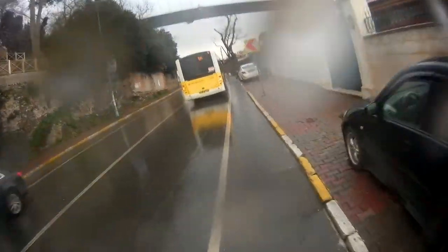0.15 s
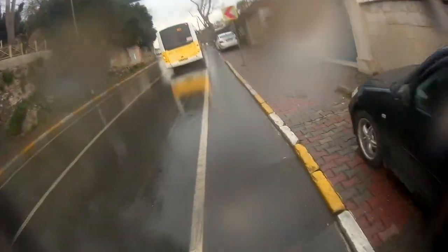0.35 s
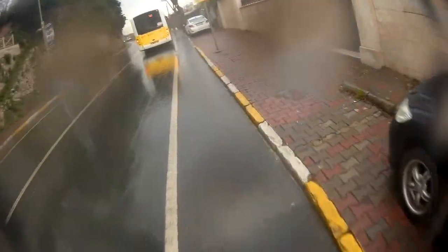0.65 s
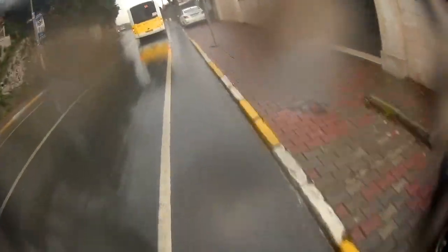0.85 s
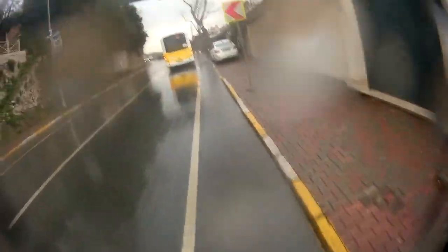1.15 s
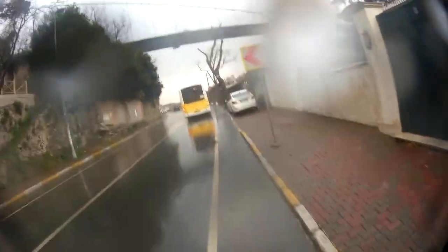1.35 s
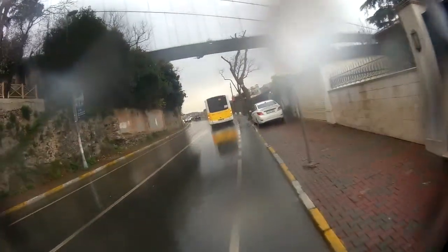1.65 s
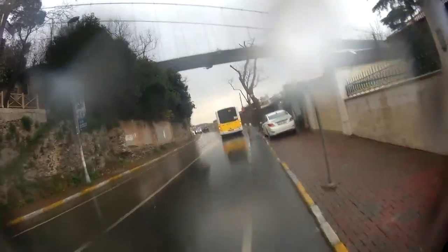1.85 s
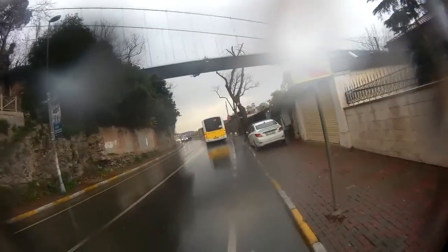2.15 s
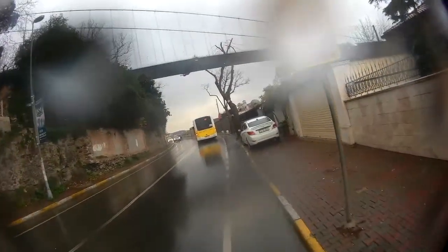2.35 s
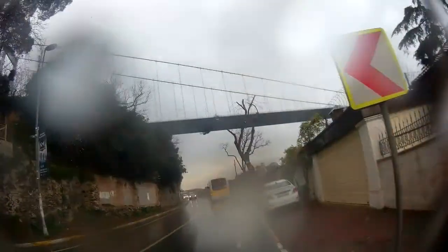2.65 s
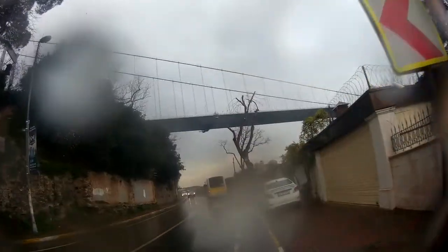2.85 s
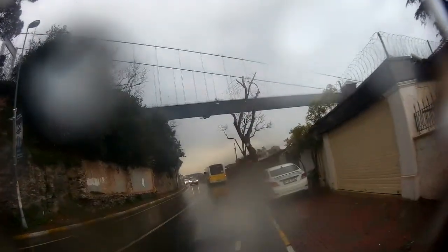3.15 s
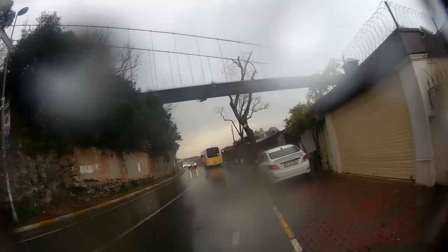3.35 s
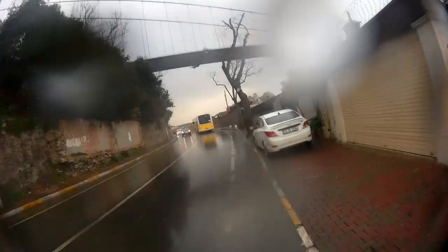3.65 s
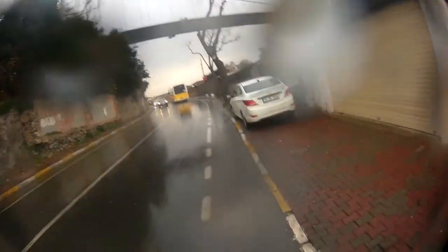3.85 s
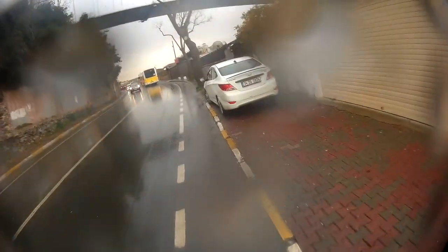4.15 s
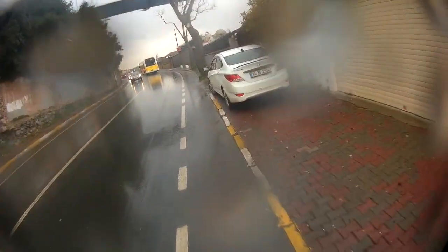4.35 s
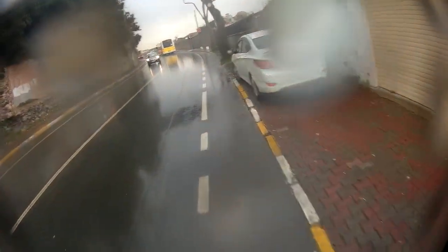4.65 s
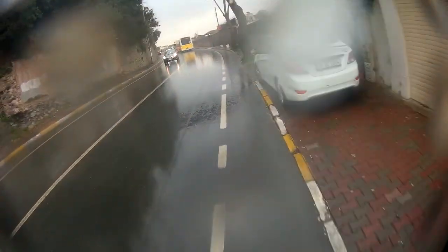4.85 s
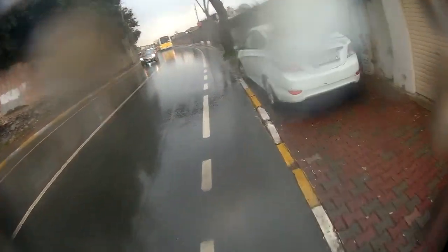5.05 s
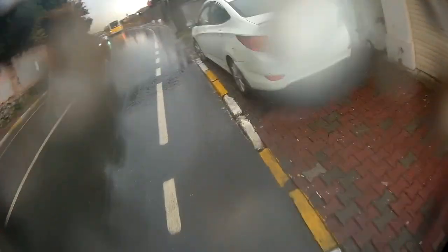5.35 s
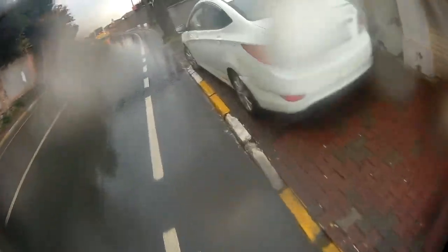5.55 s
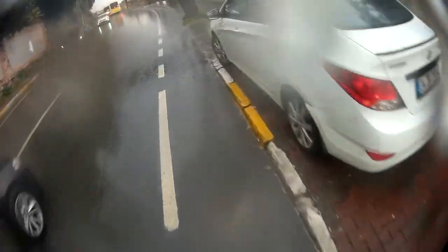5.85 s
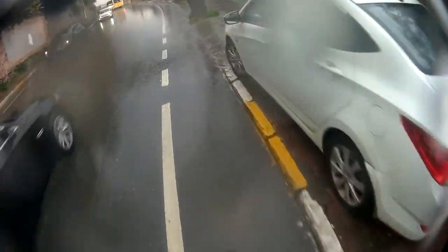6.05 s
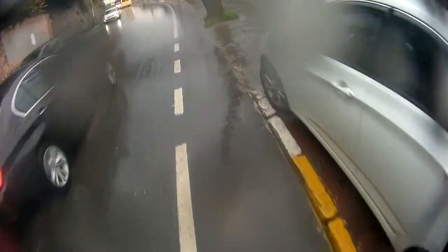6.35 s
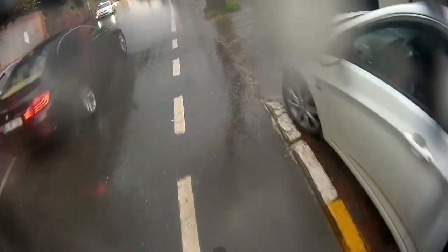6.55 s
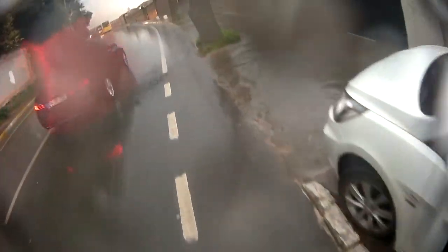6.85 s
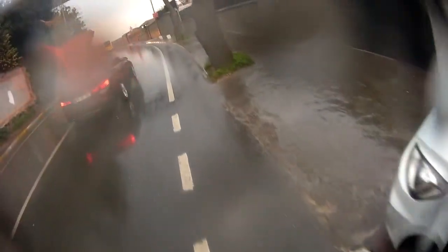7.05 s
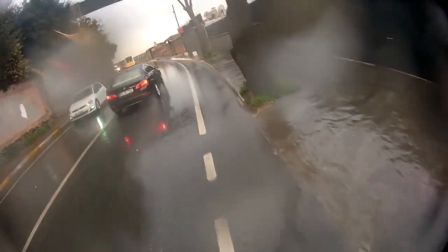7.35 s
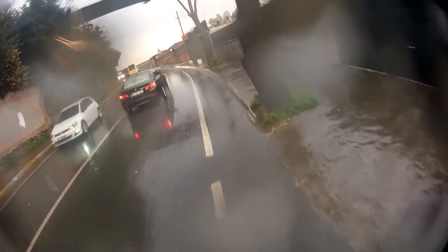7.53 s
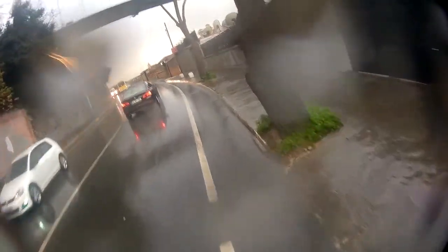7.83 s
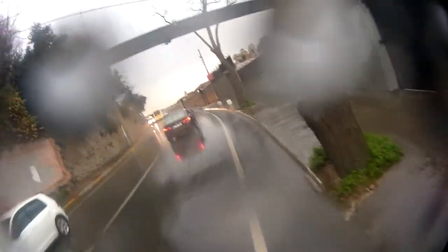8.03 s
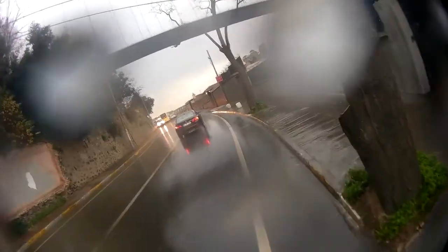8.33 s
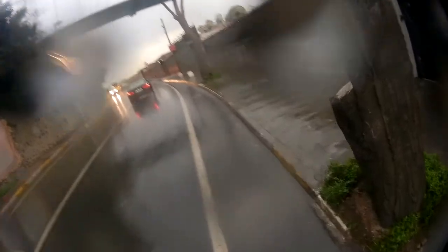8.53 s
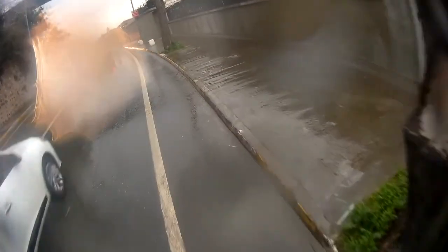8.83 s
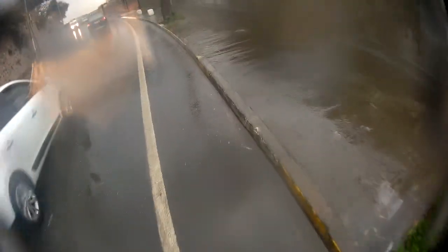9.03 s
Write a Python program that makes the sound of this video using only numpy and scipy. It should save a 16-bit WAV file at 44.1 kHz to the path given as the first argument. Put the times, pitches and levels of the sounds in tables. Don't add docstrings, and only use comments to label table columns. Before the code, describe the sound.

A muffled, boxy wash of wet tyre spray dips softly, then surges with passing cars, puddle splashes and crisp droplets hitting the camera case.

```python
import sys
import numpy as np
from scipy import signal
from scipy.fft import rfft, irfft, next_fast_len
from scipy.io import wavfile
from scipy.ndimage import uniform_filter1d

SR = 44100
rng = np.random.default_rng(int(sys.argv[2]) if len(sys.argv) > 2 else 0)


def wav_record(signal):
    frames = np.transpose(np.atleast_2d(signal))
    bounded = np.clip(frames, -1, 1)
    quanta = np.round(bounded * 32767).astype(np.int16)
    wavfile.write(sys.argv[1], SR, quanta)


def attenuation_scalar(level_db):
    decades = np.asarray(level_db, float) / 20
    return 10 ** decades


N = 405279
SIZE = next_fast_len(N)
HZ = np.arange(SIZE // 2 + 1) * SR / SIZE

# time_s, loudness_db, mist_over_splash_db
TRAFFIC = [(0.0,-40.5,5), (0.33,-41.5,2), (1.0,-43,2.2), (1.77,-46,2.5), (2.39,-48,0.6), (3.18,-52,0),
           (4.16,-51,-3), (4.24,-47.5,-2), (5.23,-42,1.4), (5.71,-36,3.5), (6.3,-35.5,0.1),
           (6.51,-37.5,-0.5), (7.41,-37,-2), (7.62,-38,-1.5), (8.45,-38.5,-1), (8.52,-37.5,0.2),
           (9.05,-38,-1), (9.19,-39,2)]
# time_s, water_film_db, asphalt_coarseness_db
ROAD = [(0.0, -2.3, 1), (0.69, 2.19, 0.2), (1.45, -0.66, 0.5), (2.28, 0.2, -1.5), (2.61, -0.5, -1),
        (3.08, -2.11, -2), (3.82, -0.7, -0.5), (4.0, 3.5, -1), (5.15, 2.4, -1.5), (5.59, 0, -4.5),
        (6.35, -1.6, 0), (6.99, -1.5, 0.2), (7.08, -2.5, -2.27), (7.91, 0, -1.8), (8.14, -2.1, -1.5),
        (9.19, -0.02, 1.1)]
# centre_s, swell_db, length_s
SHEETS = [(.62, 0.8, .1), (.97, 0.5, .12), (1.4, 0, .15), (2.2, .6, .1), (2.417, 1.4, .24),
          (2.86, 1.7, 0.26), (3.5, 0, 0.27), (3.72, 1, .1), (4.5, 1, .2), (5.45, 0.8, .06),
          (5.702, 2, 0.12), (6.118, 3, 0.34), (6.45, .8, .06), (6.68, 1.6, 0.31), (7.125, 2.5, .08),
          (7.28, -0.2, .1), (7.443, 1.5, .1), (7.93, 0.5, 0.27), (8.08, 1.3, .08), (8.3, .8, .1),
          (8.562, 1.7, 0.11), (8.68, 1, .1), (8.85, 1.2, .24)]
LAYER_DB = [
    -60.5,
    -63,
    -59,
    -50,
    -47,
    -47,
]
LAYER_RESPONSE = [
    (.59, -.48, .43, 0.4, -.15),
    (.68, -.34, -0.16, .94, .47),
    (.76, -.56, 0.99, -0.14, 1.1),
    (1.01, -0.39, -.6, -.24, 0.15),
    (.99, .13, 0.42, 0.37, .79),
    (1.06, 1, -0.17, -.1, 1.8),
]
REFERENCE_DB = -42
# frequency_hz, gain_db
WALL = [(500, -14), (900, -16), (1300, -26), (2300, -50), (2600, -26.5), (3700, -15), (6300, -13),
        (10500, -10), (14300, 3), (15700, -7.5)]
# centre_hz, width_hz, gain_db
CASE_RESONANCES = [(1090, 38, -6.5), (1447, 75, -8.5), (1535, 128, -7), (1887, 137, -9.5),
                   (2987, 370, -11.5), (4905, 764, 1), (7740, 1300, -9), (14000, 1700, -20)]
# centre_hz, width_hz, depth (0-1), start_s, end_s
NOTCHES = [(2580, 100, .25, -1, 3.8), (2580, 100, .75, 3.8, 10), (3300, 190, .8, 1.2, 1.8),
           (3250, 220, .85, 1.8, 2.42), (3270, 150, .45, 3.2, 5.9), (3350, 300, .4, 7.1, 7.9),
           (6400, 900, .42, -1, 10), (6400, 700, .2, 1.1, 1.6), (2400, 300, .2, -1, 4)]
NOTCH_FLICKER, NOTCH_FLICKERS_PER_S = .25, 10
# start_s, peak_db, centre_hz
DROPS = [(0.9084, -33, 11900), (0.931, -28, 11400), (1.355, -29, 11000), (1.3794, -33, 12600),
         (1.4341, -32, 12900), (3.5628, -39.5, 6000), (6.9845, -22, 14500), (6.9844, -33, 7500),
         (7.091, -20.5, 13700), (7.0908, -26, 8800), (7.265, -26, 12000)]
DROP_WIDTH_HZ, DROP_T60_S = 8900, 0.0049
# start_s, peak_db, centre_hz, width_hz, t60_s
SPATTER = [
    (7.094, -31.5, 11000, 8000, 0.08),
]
# start_s, peak_db, centre_hz
TICKS = [(0.6074, -39.5, 3100), (0.7022, -28, 3150), (0.9853, -38, 3200), (0.9847, -39, 4100),
         (1.1318, -43, 3250)]
TICK_WIDTH_HZ, TICK_T60_S = 1400, 0.0028
# start_s, peak_db, centre_hz
KNOCKS = [(0.608, -46, 860), (0.6085, -48, 1550), (0.734, -52, 186), (0.751, -57, 250), (0.976, -54, 310),
          (1.034, -53, 186), (1.037, -51, 298), (1.199, -57, 150)]
KNOCK_WIDTH_HZ, KNOCK_T60_S = 420, .016
# start_s, peak_db, sway_hz
BUMPS = [(.70, -54, 11.), (.795, -51, 11.6), (.883, -50, 9.6), (1.01, -48, 14.5), (1.15, -56, 13),
         (1.215, -51, 15)]
SWAY_T60_S, SWAY_OVERTONE = 0.57, 0.26
# frequency_hz, gain_db
HISS = [(15, -1.5), (40, -1.5), (120, -1.5), (300, -1), (700, -3.5), (1200, -7.5), (2300, -21), (5000, -20),
        (15000, -22)]
HISS_DB = -59.5
BAND_EDGES = [0, 40, 48, 56, 64, 72, 80, 88, 96, 108, 120, 132, 144, 160, 176, 196, 216, 240, 264, 292] + list(range(320, 737, 32))
# frequency_hz, step_db
STEP = [(500, -12), (1500, -5), (2200, 0), (2700, 3), (3300, 3), (4500, -1), (6300, 2), (9000, -1),
        (15000, -1)]
# frequency_hz, level_db
THRESHOLD = [(14300, -80), (15200, -60), (15700, -47)]
TOP_LINE = 730
# start_s, length_s, edge_hz
TREBLE_GAPS = [
    (3.553, 0.031, 8600),
    (6.306, 0.033, 8840),
]
# centre_s, bands_widened
WIDENINGS = [(.081, 1), (.258, 2), (1.528, 2), (2.222, 2), (2.287, 1), (2.986, 3), (3.235, 2), (4.634, 2),
             (4.682, 1), (5.006, 2), (5.144, 1), (6.097, 2), (7.235, 1), (8.417, 3), (8.558, 1), (8.652, 2),
             (8.884, 1), (8.928, 2), (9.047, 1)]
WIDEN_FROM_HZ, WIDEN_TO_HZ, WIDEN_WIDTH_HZ = 4200, 13200, 1500


def tyres():
    droplets = rng.standard_normal(N) * attenuation_scalar(.6 * rng.exponential(size=N) + .5 * walk(300))
    rings = sum(attenuation_scalar(2 * db) / (1 + (2 * (HZ - f) / w) ** 2) ** 1.38 for f, w, db in CASE_RESONANCES)
    case_gain = np.sqrt(slope(HZ, WALL) ** 2 + rings)
    heard = cancel(rfft(droplets, SIZE) * case_gain)
    edges = [1] + [above(HZ, edge, 24) for edge in (1700, 2500, 3600, 6400, 11000)] + [0]
    layers = np.c_[LAYER_DB] + np.array(LAYER_RESPONSE) @ road_state()
    roar_db, whine_db, sizzle_db, splash_db, spray_db, mist_db = layers
    gust = 0.19 * walk(14)
    levels = [roar_db + 0.34 * walk(10) + 0.5,
              whine_db + 0.66 * walk(10) + 0.36,
              sizzle_db + 0.48 * walk(13) + 0.21,
              splash_db + 0.43 * gust + 0.32 * walk(18),
              spray_db + gust + 0.6 * walk(20),
              mist_db + gust + 0.44 * walk(25)]
    out = np.zeros(N)
    for low, high, level in zip(edges, edges[1:], levels):
        share = np.sqrt(np.clip(low - high, 0, 1))
        part = irfft(heard * share, SIZE)[:N]
        out += unit(part) * attenuation_scalar(level)
    return out


def road_state():
    t = np.arange(N) / SR
    loud_db, mist_db = spread(TRAFFIC)
    sheets_db = sum(db * np.exp(-(2 * (t - s) / length) ** 2) for s, db, length in SHEETS)
    return np.array([loud_db - REFERENCE_DB, mist_db, *spread(ROAD), sheets_db])


def cancel(heard):
    out, t = irfft(heard, SIZE), np.arange(SIZE) / SR
    for f, width, depth, start, end in NOTCHES:
        narrow = irfft(heard / (1 + (2 * (HZ - f) / width) ** 2), SIZE)
        restless = 1 + NOTCH_FLICKER * np.resize(walk(NOTCH_FLICKERS_PER_S), SIZE)
        is_open = np.clip(np.minimum(t - start, end - t) / 0.055 + .5, 0, 1)
        out -= np.clip(depth * restless, 0, 1) * is_open * narrow
    return rfft(out)


def drops():
    bursts = [(*row, DROP_WIDTH_HZ, DROP_T60_S) for row in DROPS]
    return hits([*bursts, *SPATTER], grit=1)


def mount_knocks():
    ticks = [(*row, TICK_WIDTH_HZ, TICK_T60_S) for row in TICKS]
    knocks = [(*row, KNOCK_WIDTH_HZ, KNOCK_T60_S) for row in KNOCKS]
    return hits(ticks + knocks, grit=.2)


def hits(table, grit):
    lead = 512
    out, t = np.zeros(N), np.clip(np.arange(-lead, 4096) / SR, 0, None)
    freqs = np.arange(len(t) // 2 + 1) * SR / len(t)
    for (s, db, hz, width, t60), noise in zip(table, rng.standard_normal((len(table), len(t)))):
        ending = np.clip(10 * (1 - t / t[-1]), 0, 1)
        fade = (t / t60) ** 1.74 * attenuation_scalar(-60 * t / t60) * ending
        blow = (grit * noise + (1 - grit) * np.sin(2 * np.pi * hz * t)) * fade
        colour = np.exp(-(2 * (freqs - hz) / width) ** 4) * (freqs < TOP_LINE * SR / 2048)
        hit = irfft(rfft(blow) * colour, len(t))
        at = int(s * SR) - lead
        out[at:at + len(t)] += attenuation_scalar(db) * hit / np.abs(hit).max()
    return out


def shudder():
    out, t = np.zeros(N), np.arange(N) / SR
    for s, db, hz in BUMPS:
        age = np.clip(t - s, 0, None)
        sway = np.sin(2 * np.pi * hz * age) - SWAY_OVERTONE * np.sin(4 * np.pi * hz * age)
        out = out * np.exp(-age / 0.017) + attenuation_scalar(db - 60 * age / SWAY_T60_S) * sway
    return out


def hiss():
    floor = irfft(rfft(rng.standard_normal(SIZE)) * slope(HZ, HISS), SIZE)[:N]
    return unit(floor) * attenuation_scalar(HISS_DB)


def masked_rounding(x):
    half = 1024
    n, k = np.arange(2 * half) + .5, np.arange(TOP_LINE) + .5
    window = np.sin(np.pi * n / (2 * half))
    basis = window * np.cos(np.pi / half * np.outer(k, n + half / 2)) * np.sqrt(2 / half)
    blocks = np.pad(x, (half, 2 * half - N % half)).reshape(-1, half)
    lines = np.hstack([blocks[:-1], blocks[1:]]) @ basis.T
    widths = np.diff(np.clip(BAND_EDGES, 0, TOP_LINE))
    power = np.add.reduceat(lines ** 2, BAND_EDGES[:-1], axis=1) / widths
    masking = .6 * power + .4 * uniform_filter1d(power, size=3, axis=1)
    frame_mood = 1.5 * rng.standard_normal((len(lines), 1))
    mood = attenuation_scalar(frame_mood + 1.5 * rng.standard_normal(power.shape))
    line_hz = k * SR / 2 / half
    step = np.repeat(np.sqrt(masking) * mood, widths, axis=1) * slope(line_hz, STEP)
    step = step + slope(line_hz, THRESHOLD)
    rounded = np.sign(lines) * np.floor(np.abs(lines) / step + .42) * step
    frames = rounded @ basis
    return (frames[1:, :half] + frames[:-1, half:]).ravel()[:N]


def spread(table):
    s, *columns = np.transpose(table)
    return [np.interp(np.arange(N) / SR, s, c) for c in columns]


def slope(hz, points):
    f, db = np.transpose(points)
    return attenuation_scalar(np.interp(np.log(hz + 1), np.log(f), db))


def unit(x):
    return x / np.sqrt(np.mean(x ** 2))


def walk(rate):
    k = int(SR / rate)
    held = np.repeat(rng.standard_normal(N // k + 1), k)
    return unit(uniform_filter1d(uniform_filter1d(held, k), k)[:N])


def above(hz, edge_hz, sharp):
    return 1 / (1 + (edge_hz / (hz + 1)) ** sharp)


def band(x, lo_hz, hi_hz):
    hz = np.arange(len(x) // 2 + 1) * SR / len(x)
    return irfft(rfft(x) * ((hz > lo_hz) & (hz < hi_hz)), len(x))


def scene():
    steady = masked_rounding(tyres() + hiss() + shudder())
    mono = steady + drops() + mount_knocks()
    return np.array([mono, mono])


def roll_off(x):
    return signal.sosfilt(signal.butter(12, 16010, fs=SR, output="sos"), x)


def record(dry):
    mono, side, n = dry[0].copy(), np.zeros(N), np.arange(4096)
    for s, length, edge_hz in TREBLE_GAPS:
        at = int(s * SR) - 1024
        gate = np.clip(np.minimum(n - 1024, 1024 + length * SR - n) / 60, 0, 1)
        mono[at:at + 4096] -= band(mono[at:at + 4096], edge_hz, SR) * np.sin(gate * np.pi / 2) ** 2
    window = np.kaiser(2048, 6)
    times = [s for s, count in WIDENINGS for _ in range(count)]
    places = rng.permutation(np.linspace(WIDEN_FROM_HZ, WIDEN_TO_HZ, len(times)))
    for s, lo_hz, noise in zip(times, places, rng.standard_normal((len(times), 2048))):
        hi_hz = lo_hz + WIDEN_WIDTH_HZ
        at = int(s * SR) - 1024
        own = band(mono[at:at + 2048], lo_hz, hi_hz)
        side[at:at + 2048] += attenuation_scalar(-2.0) * np.std(own) * unit(band(noise, lo_hz, hi_hz)) * window
    return roll_off(np.array([mono + side, mono - side]))


dry = scene()
out = record(dry)
wav_record(out)
```